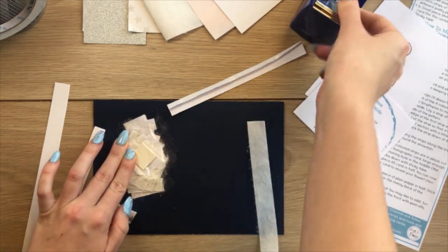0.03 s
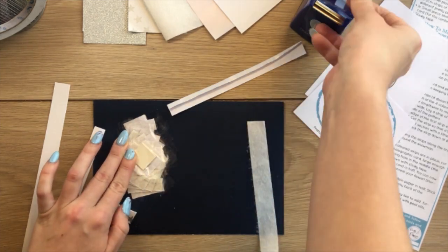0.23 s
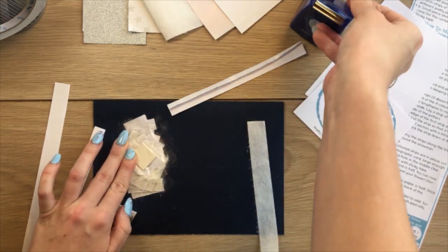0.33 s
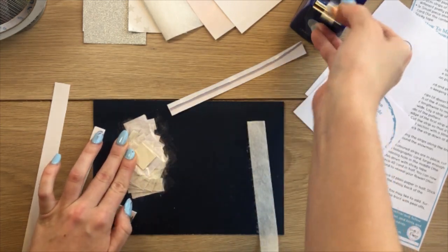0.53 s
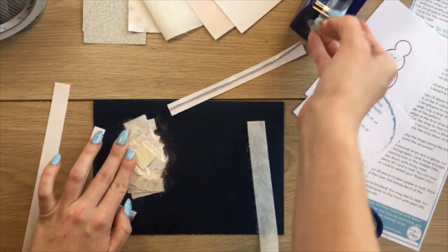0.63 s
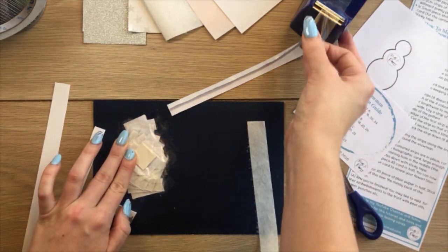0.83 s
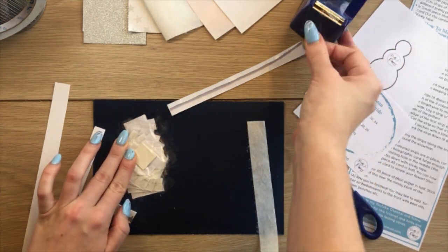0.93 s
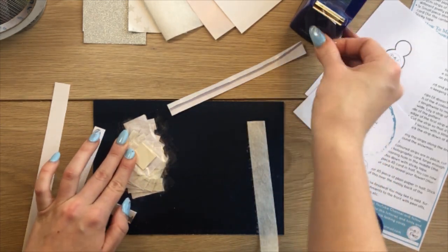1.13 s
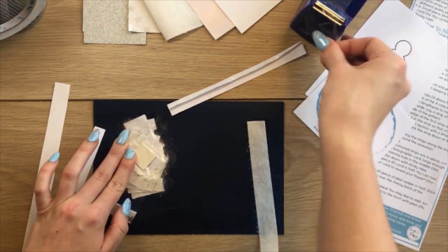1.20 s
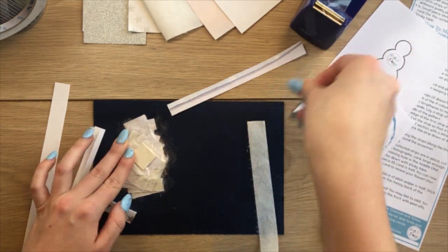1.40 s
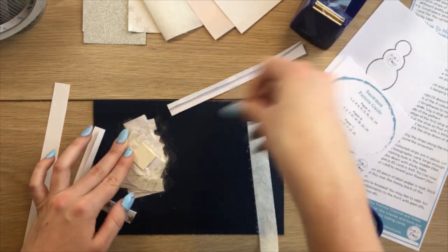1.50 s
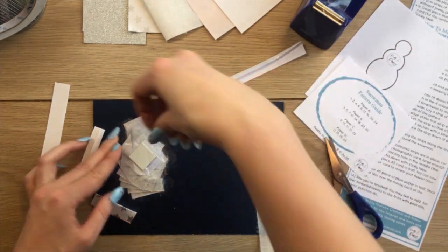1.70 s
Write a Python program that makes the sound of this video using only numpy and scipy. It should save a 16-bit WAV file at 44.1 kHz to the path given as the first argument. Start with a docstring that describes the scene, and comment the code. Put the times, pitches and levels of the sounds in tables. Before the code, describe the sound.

Sticky tape snaps loose, rasps off a desk dispenser, then tears on the blade with crackles

```python
"""Sticky tape is pulled from a desk dispenser in a small room, over a quiet background of shaped noise.
First the tape lifts with a few snaps (short noise cracks) while the roll knocks in its cradle (ringing tones).
Then it unrolls in a rasping run of jerks: noise cracks with fine glue crackle and a shaken hollow housing.
It crackles onto the blade, which rings when plucked as the tape tears. Soft thuds (low swings with rumble)
run from the start until after the tear, and swells of noise rub along; last, fingers brush and tap on card."""
import sys
import numpy as np
from scipy import signal
from scipy.fft import rfft, irfft
from scipy.io import wavfile

SR = 44100
rng = np.random.default_rng(int(sys.argv[2]) if len(sys.argv) > 2 else 0)


def waveform_to_disk(signal):
    """Save audio, clipped to [-1, 1], as 16-bit WAV at the path in sys.argv[1]."""
    frames = np.transpose(np.atleast_2d(signal))
    scaled = np.clip(frames, -1, 1) * 32767
    samples = np.round(scaled).astype(np.int16)
    wavfile.write(sys.argv[1], SR, samples)


N = 77175
TIME = np.arange(N) / SR  # seconds

# sixteen neighbouring frequency bands, shared by the cracks and the room
EDGES_HZ = np.geomspace(100, 17000, 17)
CENTRES_HZ = np.sqrt(EDGES_HZ[1:] * EDGES_HZ[:-1])
BANK = [signal.butter(2, pair, "band", fs=SR, output="sos") for pair in zip(EDGES_HZ, EDGES_HZ[1:])]


def from_db(db):
    """Turn decibels into a gain."""
    return 10 ** (np.asarray(db) / 20)


def rms_one(x):
    """Scale a sound to an rms of 1."""
    return x / np.sqrt(np.mean(x ** 2) + 1e-20)


def at_hz(points, hz):
    """Read a table of (Hz, value) between its points, on a log-frequency axis."""
    f, value = np.transpose(points)
    return np.interp(np.log(hz), np.log(f), value)


def add(out, s, sound):
    """Mix a sound in, starting at s seconds."""
    start = max(int(s * SR), 0)
    part = sound[:max(N - start, 0)]
    out[start:start + len(part)] += part


def coloured(x, db_of_hz):
    """Shape the spectrum of a noise by a curve of dB against Hz, then scale it to an rms of 1."""
    hz = np.maximum(np.fft.rfftfreq(len(x), 1 / SR), 1)
    shaped = irfft(rfft(x) * from_db(db_of_hz(hz)), len(x))
    return rms_one(shaped)


def hump(centre_hz, octaves):
    """Make a broad spectral peak, as a curve of dB against Hz."""
    return lambda hz: -20 * np.log10(1 + (np.log2(hz / centre_hz) / octaves) ** 2)


BURST_RISE_S, BURST_S = .00015, .008  # the front, and where the crack is cut off
SPIKE_DB, SPIKE_S = 6, .00025  # extra spike at the front and its decay
BURST_GRIT_DB = 3  # random spread of the level from sample to sample


def bursts(times, band_db, decay_s):
    """Sharp-fronted gritty noise cracks; band_db (events x bands) sets the level of each band."""
    t = TIME[:1024]
    shape = (len(times), len(t))
    rise = 1 - np.exp(-t / BURST_RISE_S)
    fall = np.exp(-t / decay_s) + from_db(SPIKE_DB) * np.exp(-t / SPIKE_S)
    envelope = rise * fall * (t < BURST_S)
    grit = from_db(BURST_GRIT_DB * rng.standard_normal(shape))
    noises = rng.standard_normal((2, *shape)) * grit * envelope + 1e-18
    cracks, out = np.zeros(shape), np.zeros(N)
    for k, sos in enumerate(BANK):
        # neighbouring bands use different noises
        band = signal.sosfilt(sos, noises[k % 2])
        # rms as if all the energy lay within 4 ms
        level = np.sqrt(np.sum(band ** 2, axis=1) / (.004 * SR))
        cracks += band * (from_db(band_db[:, k]) / level)[:, None]
    for s, crack in zip(times, cracks):
        add(out, s, crack)
    return out


RING_RISE_S = .001


def struck(hits, modes, spread_db):
    """Each hit rings every mode (a decaying sine) with random strength; the ring takes a moment to build."""
    out, t = np.zeros(N), TIME[:SR // 6]
    hz, mode_db, t60 = np.transpose(modes)
    decay = from_db(-60 * t / t60[:, None])
    rise = 1 - np.exp(-(t / RING_RISE_S) ** 2)
    rings = np.sin(2 * np.pi * hz[:, None] * t) * decay * rise
    chances = rng.standard_normal((len(hits), len(modes)))
    for (s, db), chance in zip(hits, chances):
        strengths = from_db(db + mode_db + spread_db * chance)
        add(out, s, strengths @ rings)
    return out


# Colour of the quiet background. Each row: frequency in Hz, relative level in dB per Hz.
BACKGROUND_COLOUR = [(30, -11.5), (70, 0.5), (150, -9), (300, -11.5), (700, -18), (1500, -24.5),
                     (4000, -30.5), (16000, -34)]
BACKGROUND_DB = -65.5  # rms level of the whole background


def background():
    """Steady noise with its own colour lies under the whole scene."""
    return from_db(BACKGROUND_DB) * coloured(rng.standard_normal(N), lambda hz: at_hz(BACKGROUND_COLOUR, hz))


# Early echoes from near surfaces. Each row: delay in seconds, level in dB against the direct sound.
NEAR_ECHOES = [(.0073, -18), (.0086, -25.5)]
# How long the room rings. Each row: frequency in Hz, time in seconds to fall by 60 dB.
TAIL_T60 = [(150, 0.16), (1000, 0.19), (5000, 0.17), (14000, 0.17)]
# How loud the room rings. Each row: frequency in Hz, level in dB against the direct sound.
TAIL_LEVEL = [(150, -0.5), (1000, -2.5), (5000, -6), (14000, -11)]
TAIL_ONSET_S = 0.0016


def room(x):
    """Direct sound, near echoes and a short diffuse tail of noise that dies band by band."""
    t = TIME[:SR // 2]
    response, white = np.zeros(len(t)), rng.standard_normal((2, len(t)))
    onset = 1 - np.exp(-(t / TAIL_ONSET_S) ** 2)
    for k, (sos, hz) in enumerate(zip(BANK, CENTRES_HZ)):
        decay = from_db(-60 * t / at_hz(TAIL_T60, hz))
        tail = signal.sosfilt(sos, white[k % 2]) * decay * onset
        # the band's part of the energy of the direct sound
        share = 2 * (EDGES_HZ[k + 1] - EDGES_HZ[k]) / SR
        response += tail * np.sqrt(share / np.sum(tail ** 2)) * from_db(at_hz(TAIL_LEVEL, hz))
    for delay_s, db in NEAR_ECHOES:
        response[int(delay_s * SR)] += from_db(db)
    return x + signal.fftconvolve(x, response)[:N]


# Soft thuds through the desk. Each row: start in seconds, level in dB before the rise and decay,
# pitch in Hz, decay time in seconds.
DESK_THUDS = [(.005, -71, 87, 0.023), (.172, -44.5, 216.4, 0.02), (.275, -46.5, 82.2, 0.057),
              (0.376, -49.5, 129.4, 0.05), (.425, -43, 79.5, 0.043), (.575, -47.5, 83.4, 0.047),
              (0.728, -43, 74.9, 0.043), (.78, -50.5, 121, .02), (1.05, -50, 174, 0.037),
              (1.099, -48.5, 130.3, 0.038), (1.216, -47.5, 174, 0.034), (1.253, -40, 165, 0.02),
              (1.283, -41.5, 117.3, 0.051), (1.387, -51.5, 212, 0.032)]
THUD_RISE_S = 0.0099
THUD_NOISE_DB, THUD_OCTAVES = -3.5, 0.9  # rumble: rms level against the swing's peak, and width


def thuds():
    """The dispenser rocks on the desk: soft, quickly damped swings with some rumble around them."""
    out, t = np.zeros(N), TIME[:8192]
    for s, db, hz, decay_s in DESK_THUDS:
        noise = rng.standard_normal(len(t))
        rumble = from_db(THUD_NOISE_DB) * coloured(noise, hump(hz, THUD_OCTAVES))
        swing = np.sin(2 * np.pi * hz * t)
        envelope = (1 - np.exp(-t / THUD_RISE_S)) * np.exp(-t / decay_s)
        add(out, s, from_db(db) * (swing + rumble) * envelope)
    return out


# Rubbing of tape, roll and fingers on card. Each row: start in seconds, length in seconds,
# level in dB before the swell, centre frequency in Hz.
RUBS = [(0.216, 0.044, -44.5, 4970), (0.334, 0.035, -52.5, 6000), (0.367, 0.044, -34, 9300),
        (0.415, 0.013, -28.5, 9200), (0.498, 0.033, -55, 9100), (.533, 0.056, -44.5, 706),
        (.872, 0.024, -60, 550), (.876, 0.019, -64.5, 1300), (0.907, 0.023, -64, 1345),
        (1.595, 0.017, -58, 598), (1.596, 0.011, -54, 1510), (1.636, 0.014, -51, 1450),
        (1.624, 0.045, -63.5, 5500), (1.729, 0.026, -64, 5000)]
RUB_OCTAVES, RUB_GRIT_DB = 0.97, 4  # width of the colour, and random spread of the grain


def brushes():
    """Friction makes short swells of grainy noise."""
    out = np.zeros(N)
    for s, length_s, db, centre_hz in RUBS:
        noise, grit = rng.standard_normal((2, 4096))
        grainy = noise * from_db(RUB_GRIT_DB * grit)
        rub = coloured(grainy, hump(centre_hz, RUB_OCTAVES))
        swell = np.sin(np.pi * np.minimum(TIME[:len(rub)] / length_s, 1))
        add(out, s, from_db(db) * rub * swell)
    return out


# The roll knocks in its cradle. Each row: start in seconds, strength in dB.
KNOCKS = [(.2495, -45), (.2905, -35), (.376, -42), (.4295, -25.5)]
# The tones of the roll. Each row: frequency in Hz, level in dB added to the knock,
# time in seconds to fall by 60 dB.
ROLL_TONES = [(1113, -0.5, 0.066), (1040, -2, 0.017), (1189, -3, 0.032), (1430, -10.5, 0.035),
              (890, -18, 0.021), (535, -18.5, 0.03), (2390, -12, .03), (3440, -4.5, 0.05),
              (5530, -18.5, .03)]


def roll_knocks():
    """A knock makes the roll ring at its own tones, each quickly damped."""
    return struck(KNOCKS, ROLL_TONES, spread_db=3.5)


# The blade is plucked as the tape tears. Each row: start in seconds, strength in dB.
PLUCKS = [(1.075, -74), (1.09, -45), (1.2535, -32.5), (1.2642, -37), (1.3075, -47)]
# The tones of the blade. Each row: frequency in Hz, level in dB added to the pluck,
# time in seconds to fall by 60 dB.
BLADE_TONES = [(1378, 2.5, 0.043), (1316, -1, 0.037), (1217, -4, 0.03), (1530, 0, 0.025), (878, -12, 0.027),
               (2430, -9, .03), (2663, -28, 0.027), (3688, 6, 0.033)]


def blade_plucks():
    """A pluck makes the blade ring at its own tones, each quickly damped."""
    return struck(PLUCKS, BLADE_TONES, spread_db=4.5)


# Single snaps and crackles of tape, blade and nails. Each row: start in seconds,
# then the relative level in dB at each of the four frequencies below.
LONE_SNAPS = [(0.066, -87, -67, -57.5, -65), (0.1195, -74, -64.5, -58, -53), (0.1668, -55, -56, -48.5, -62),
              (0.17, -60.5, -46, -72, -60), (0.213, -75, -73, -25, -29), (0.2312, -47, -42, -25, -33),
              (0.2365, -50, -42, -30, -63), (0.241, -82, -27.5, -31, -29), (0.244, -54, -60, -24.5, -31.5),
              (0.2494, -48, -26.5, -58, -36), (0.2519, -49, -44, -33, -29), (0.2891, -45, -34.5, -33, -14),
              (0.374, -41.5, -34, -19.5, -16.5), (0.4055, -38, -39, -22.5, -12),
              (0.4285, -47, -31, -15.5, -17.5), (0.9235, -80, -50.5, -46.5, -42),
              (0.9418, -71, -68, -52, -74), (1.0108, -75, -83, -65, -57), (1.0178, -76, -83, -64, -74),
              (1.0444, -40, -40, -32.5, -28.5), (1.0676, -65, -49, -46, -47),
              (1.0734, -55.5, -29, -39, -36), (1.075, -42.5, -43, -35, -42),
              (1.0804, -52, -63, -30.5, -32.5), (1.0899, -45, -43, -37, -33.5),
              (1.1268, -79, -81, -59, -45), (1.1909, -61, -42.5, -29, -36), (1.2049, -50, -57, -41, -32),
              (1.2135, -52, -49, -35.5, -65), (1.2494, -39, -28.5, -27, -25),
              (1.2535, -45, -52, -32.5, -36), (1.2631, -49, -29, -30, -21), (1.3072, -51, -47, -42, -41),
              (1.3486, -71, -63, -52, -71), (1.3736, -51.5, -36.5, -24, -28.5),
              (1.5367, -76, -68, -65, -65), (1.574, -60, -55, -46, -42), (1.663, -74.5, -76, -53.5, -59.5),
              (1.6734, -76, -53.5, -55, -66)]
# The frequencies of those four levels, in Hz.
SNAP_POINTS_HZ = [1300, 3200, 7000, 12600]
SNAP_DB, SNAP_DECAY_S = -4.5, 0.0018  # shift of all the levels, and decay time
SNAP_BASS_DB_PER_OCTAVE = 11  # loss below the lowest of the four frequencies


def snaps():
    """Lone cracks, each with its own colour and little bass."""
    rows = np.array(LONE_SNAPS)
    octaves_below = np.maximum(np.log2(SNAP_POINTS_HZ[0] / CENTRES_HZ), 0)
    bass_loss_db = SNAP_BASS_DB_PER_OCTAVE * octaves_below
    colour = np.array([np.interp(np.log(CENTRES_HZ), np.log(SNAP_POINTS_HZ), row[1:]) for row in rows])
    return bursts(rows[:, 0], SNAP_DB + colour - bass_loss_db, SNAP_DECAY_S)


# Colour of a jerk while the free tape is short. Each row: frequency in Hz, relative level in dB per Hz.
SHORT_COLOUR = [(150, -16), (400, -19.5), (800, -15), (1800, -15.5), (4000, -14.5), (7000, -4.5),
                (10500, -8), (13000, 2.5)]
# Colour of a jerk once the free tape is long. Each row: frequency in Hz, relative level in dB per Hz.
LONG_COLOUR = [(150, -16.5), (400, -16), (800, -14.5), (1800, -11.5), (4000, -3.5), (7000, -2.5),
               (10000, 1), (14000, 0.5)]


def tape_colour(times, start_s, end_s):
    """The colour glides from short to long tape as the strip lengthens; gives dB for each event and band."""
    length = ((times - start_s) / (end_s - start_s))[:, None]  # 0 is short, 1 is long
    share_db = 10 * np.log10(np.diff(EDGES_HZ) / 10000)  # wider bands hold more energy
    short, long = at_hz(SHORT_COLOUR, CENTRES_HZ), at_hz(LONG_COLOUR, CENTRES_HZ)
    return (1 - length) * short + length * long + share_db


# Jerks of the tape leaving the roll. Each row: start in seconds, relative level in dB.
JERKS = [(0.5348, -18.5), (0.546, -24.5), (0.5501, -22), (0.5539, -18.5), (0.5629, -22.5), (0.571, -21.5),
         (0.5746, -20.5), (0.5868, -21.5), (0.59, -22), (0.5978, -18), (0.6018, -22.5), (0.6096, -20),
         (0.6204, -19.5), (0.6242, -18.5), (0.6283, -18.5), (0.6327, -20), (0.6404, -21), (0.6445, -20.5),
         (0.6479, -18.5), (0.6506, -16), (0.6619, -13.5), (0.68, -19), (0.6872, -15.5), (0.6945, -18),
         (0.7028, -18.5), (0.7055, -15), (0.709, -19), (0.716, -16.5), (0.7231, -19), (0.7422, -17)]
# Tones of the hollow housing. Each row: frequency in Hz, level in dB added to the mean jerk level,
# time in seconds to fall by 60 dB.
HOUSING_TONES = [(81, -50, 0.2), (198, -44.5, 0.064), (257, -37, 0.16), (296, -38, 0.12),
                 (566, -28.5, 0.13), (643, -27.5, 0.02), (800, -29.5, .045), (1465, -28, .05)]
JERK_DB, JERK_DECAY_S = 1.5, 0.0022  # shift of all the jerk levels, and decay time
# glue crackle: rate, level added to the mean jerk level, and random spread to either side
GLUE_PER_S, GLUE_DB, GLUE_SPREAD_DB = 200, -23, 5


def unrolling():
    """The tape sticks and slips: jerks crack and shake the housing, and the glue crackles between them."""
    s, db = np.transpose(JERKS)
    start_s, end_s = s[0], s[-1]
    run_s = end_s - start_s
    jerks = bursts(s, JERK_DB + db[:, None] + tape_colour(s, start_s, end_s), JERK_DECAY_S)
    housing = struck([(when, db.mean()) for when in s], HOUSING_TONES, spread_db=4.5)
    # each draw gives a random time and a random level
    draws = rng.random((200, 2))[:int(GLUE_PER_S * run_s)]
    glue_s = start_s + draws[:, 0] * run_s
    glue_db = db.mean() + GLUE_DB + GLUE_SPREAD_DB * (2 * draws[:, 1:] - 1)
    glue = bursts(glue_s, glue_db + tape_colour(glue_s, start_s, end_s), JERK_DECAY_S)
    return jerks + housing + glue


def scene():
    """Tape, dispenser and rubbing sound in the room; thuds and background are added without its echoes."""
    dispenser = roll_knocks() + blade_plucks()
    in_room = room(unrolling() + snaps() + dispenser + brushes())
    return (in_room + thuds() + background())[None]


LOW_CUT_HZ, CUTOFF_HZ = 42, 15900
PEAK_LIMIT = 0.67  # full scale is 1


def record(dry):
    """The microphone loses the deep bass, peaks over the limit are clipped and the top is cut steeply."""
    thin = signal.sosfilt(signal.butter(2, LOW_CUT_HZ, "high", fs=SR, output="sos"), dry)
    held = np.clip(thin, -PEAK_LIMIT, PEAK_LIMIT)
    return signal.sosfilt(signal.ellip(10, .2, 80, CUTOFF_HZ, fs=SR, output="sos"), held)


dry = scene()
out = record(dry)
waveform_to_disk(out)
```